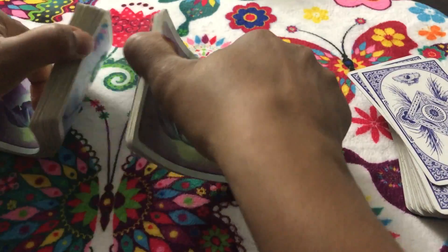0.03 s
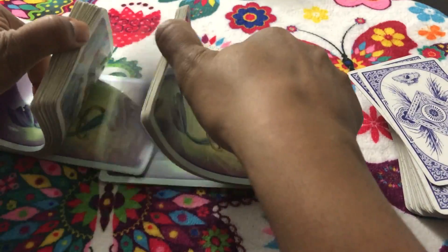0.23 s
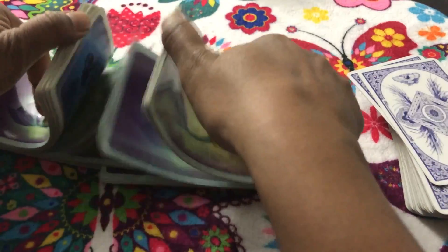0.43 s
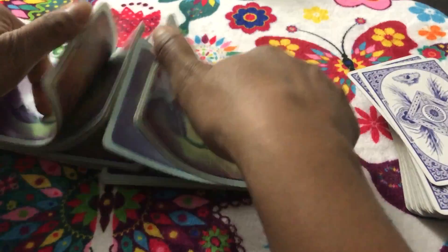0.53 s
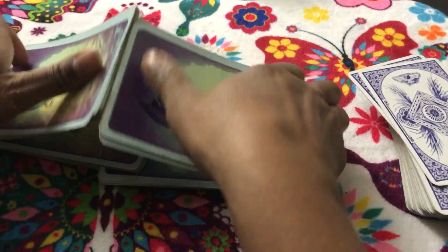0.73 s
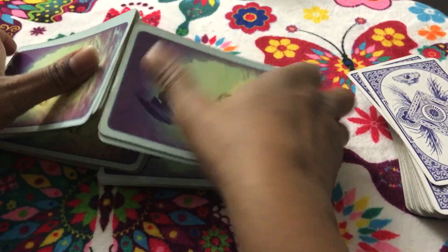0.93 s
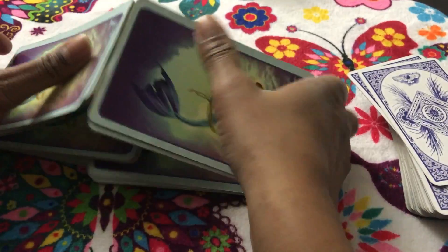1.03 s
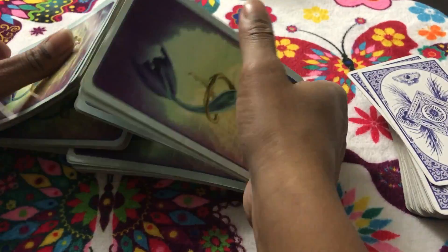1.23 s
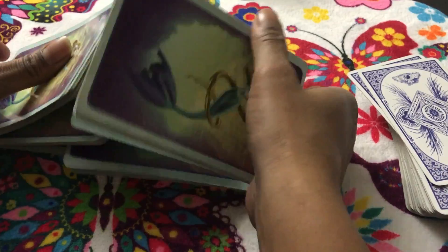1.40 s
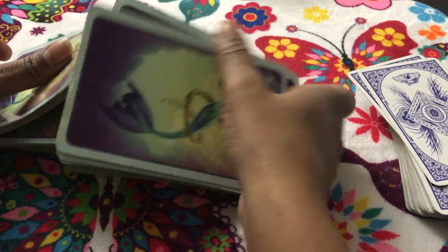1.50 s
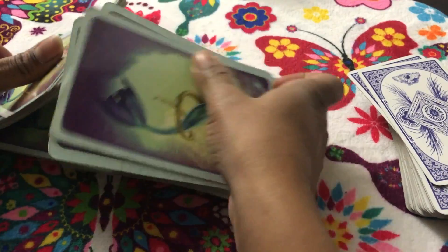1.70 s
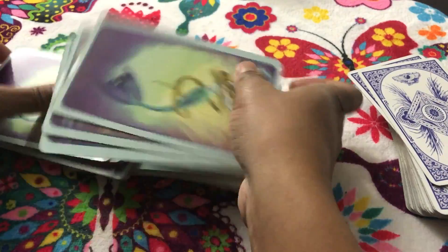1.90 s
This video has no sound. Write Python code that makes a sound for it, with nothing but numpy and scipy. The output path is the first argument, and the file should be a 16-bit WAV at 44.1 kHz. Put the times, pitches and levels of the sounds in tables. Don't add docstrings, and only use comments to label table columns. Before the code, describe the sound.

A deck of large stiff cards is riffled close to a phone microphone on a cloth-covered table, a rapid burst of flicks and slaps, then quiet sliding and light ticks in a softly humming room.

```python
import sys
import numpy as np
from scipy import signal
from scipy.io import wavfile
from scipy.ndimage import uniform_filter1d

SR = 44100
rng = np.random.default_rng(int(sys.argv[2]) if len(sys.argv) > 2 else 0)


def materialize(psi):
    bounded = np.clip(np.atleast_2d(psi).T, -1, 1)
    quanta = np.round(bounded * 32767).astype(np.int16)
    wavfile.write(sys.argv[1], SR, quanta)


def attenuation_scalar(level_db):
    decades = np.asarray(level_db, float) / 20
    return 10 ** decades


N = 85995

# frequency in Hz, width in Hz, level in dB.
HUM_MODES = [
    (46.3, 30, -63.5),
    (99, 4.1, -69),
    (133, 10, -65),
    (234, 3.6, -66),
]
# frequency in Hz, density in dB per Hz.
AIR_SPECTRUM = [(15, -26.5), (25, -2), (182, -16.5), (245, -17.5), (766, -24.5), (1030, -11.5),
                (1730, -16.5), (15200, -34.5), (16500, -52.5)]
# time in seconds, rustle in dB, air puff in dB.
THUMB_PUSH = [(0, -65.5, -81), (.13, -61, -80), (.17, -59, -42.5), (.215, -43, -31.5), (.25, -45, -47.5),
              (.285, -38.5, -30.5), (.32, -53.5, -44.5), (.37, -45, -42), (.43, -24, -38),
              (.455, -39.5, -40), (.5, -45.5, -46.5), (.55, -42, -31.5), (.59, -22, -40.5),
              (.612, -38, -50.5), (.655, -19, -33), (.69, -37, -38), (.74, -46, -61), (.85, -72.5, -72)]
# frequency in Hz, density in dB per Hz.
RUSTLE_SPECTRUM = [(88, -31), (150, -5.5), (1470, -3.5), (1860, -5.5), (2920, -7), (4870, -14),
                   (13000, -21), (15600, -31), (16500, -38.5)]
# frequency in Hz, density in dB per Hz.
PUFF_SPECTRUM = [(25, -20.5), (60, -1.5), (150, -2.5), (400, -20.5), (1500, -55)]
# time in seconds, level in dB.
SLIDE_LEVELS = [(0, -64), (.14, -85), (.2, -84), (.76, -58.5), (.8, -58.5), (.95, -62), (1.035, -52),
                (1.07, -58), (1.15, -57), (1.2, -57), (1.27, -65.5), (1.42, -71), (1.445, -53.5),
                (1.5, -62.5), (1.62, -67.5), (1.76, -64), (1.83, -65.5), (1.87, -65.5), (1.95, -60.5)]
# frequency in Hz, density in dB per Hz.
RUB_SPECTRUM = [(240, -64.5), (400, -9), (1390, 1.5), (1620, -3.5), (3370, -4), (13100, -13.5),
                (15700, -12.5), (16500, -37)]
# time in seconds, peak in dB, card pitch in
# Hz, edge snap in dB.
CARD_FLICKS = [(0.147, -30, 790, -39), (0.166, -35, 702, -5.5), (0.1722, -26.5, 2625, -12),
               (0.1736, -28.5, 699.7, -16), (0.184, -25, 3486, -2), (0.189, -14.5, 1100, -10),
               (0.1915, -17.5, 796, -22), (0.195, -24.5, 996, -20), (0.232, -29.5, 1011, -15),
               (0.235, -27, 756, -13.5), (0.237, -23, 600, -21), (0.258, -42.5, 847, 4.5),
               (0.265, -26.5, 3677, 1), (0.272, -23, 2872, -17), (0.2806, -15.5, 598, -11.5),
               (0.283, -23, 3810, -18.5), (0.2842, -20, 380, -26), (0.288, -21.5, 898, -7),
               (0.292, -24.5, 1300, -20.5), (0.296, -43, 1031, -6), (0.334, -28.5, 833, -13),
               (0.349, -34.5, 713.5, -10.5), (0.36, -20.5, 1064, -25), (0.37, -19.5, 1433, -21.5),
               (0.374, -20.5, 787, -14.5), (0.388, -22.5, 883, -8), (0.397, -21.5, 1483, -16),
               (0.404, -23.5, 3220, -21.5), (0.4099, -23.5, 1600, -21), (0.4306, -21, 1602, -24),
               (0.444, -27, 4600, -7.5), (0.449, -20.5, 724, -7.5), (0.4521, -17, 902, -7.5),
               (.493, -32, 6600, 2.5), (0.505, -38, 5000, 0.5), (.507, -28, 4460, -5),
               (0.5226, -7.5, 1840, -28), (.528, -27, 1500, -13.5), (0.5324, -14.5, 1700, -13.5),
               (0.5491, -8.5, 1960, -18), (0.5498, -18, 3380, -18.5), (0.5535, -24, 1910, -23.5),
               (.562, -30.5, 1900, -22), (.5695, -26, 2028, -11), (.5717, -15.5, 3630, -15.5),
               (.576, -24, 1715, -24), (.5795, -16, 2030, -16), (0.5815, -13, 3010, -25),
               (0.5832, -31, 1520, -17), (0.5881, -16, 700, -19.5), (0.5903, -18.5, 2827, -21),
               (0.5953, -19, 2000, -20), (.599, -15, 2500, -20), (.61, -27.5, 2246, -11),
               (.6335, -21, 1500, -16), (.638, -22.5, 990, -16), (0.6444, -13.5, 1520, -18),
               (0.6459, -18.5, 1080, -7), (0.6496, -17.5, 2330, -10.5), (.654, -13.5, 1620, -0.5),
               (0.6573, -24, 1200, -23), (0.662, -14.5, 2240, -17), (0.664, -15.5, 1400, -16),
               (.672, -24, 1580, 5), (0.6758, -25, 1320, -14), (.683, -25, 800, -7), (.689, -28, 1530, -3),
               (.702, -18, 3650, -29), (.715, -36, 2470, -2)]
# time in seconds, peak in dB, card pitch in Hz, edge snap in dB, upper mode in Hz.
PUSH_TICKS = [(0.869, -44, 790, -5, 3180), (1.045, -34.5, 1190, -8, 3060), (1.072, -48, 982, 4, 3800),
              (1.085, -52, 1300, -15, 2740), (1.097, -31, 1415, -25, 2550), (1.141, -44, 1024, -7, 3980),
              (1.168, -31.5, 1303, -25, 2430), (1.185, -31, 1655, -15, 3875),
              (1.437, -39.5, 1058, -21, 3280), (1.475, -28, 3330, -6, 2080), (1.693, -28, 1395, -20, 2395),
              (1.7455, -36.5, 2900, -9, 3950), (1.877, -26.5, 1430, -14.5, 4090),
              (1.883, -23.5, 1440, -12, 3980), (1.9368, -18, 1520, -10, 4250)]
# time
# in seconds, peak in dB, pitch in Hz, ring t60 in seconds, edge snap in dB.
CLUMP_SLAPS = [(.2038, -10.5, 850, 0.019, -13.5), (0.2056, -11.5, 680, 0.015, -30),
               (.2042, -12, 1500, 0.019, -17.5), (.2052, -12, 4000, 0.0067, -16),
               (.2056, -15.5, 2980, 0.012, -20), (.2062, -15, 5440, 0.0056, -16),
               (.2155, -26.5, 1360, 0.035, -20), (.4135, -11.5, 5840, 0.0022, -22),
               (.4138, -16, 3440, 0.0081, -25), (.4155, -9, 1110, 0.0052, -31),
               (.4172, -4, 2580, 0.014, -33.5), (0.4199, -4, 3320, 0.012, -33),
               (.4178, -5.5, 3270, 0.012, -26), (0.4234, -19.5, 2450, 0.26, -36.5),
               (.429, -25.5, 3340, .2, -30.5), (.5342, -4, 1670, 0.015, -23),
               (.5372, -9.5, 3440, 0.012, -22), (0.5418, -9.5, 2094, 0.016, -30),
               (.546, -17.5, 1970, 0.051, -30), (.5408, -5, 1100, .006, -41),
               (.6198, -17.5, 1890, 0.0094, 3), (.6225, -15, 1650, 0.013, 0.5),
               (.6238, -11, 946, 0.014, -16), (.6258, -14, 2370, 0.004, 0.5), (.6272, -7, 2360, 0.0064, -2),
               (.6274, -6.5, 3480, 0.0092, -16.5), (1.1865, -40, 958, 0.017, -21),
               (1.4752, -32.5, 890, 0.027, -28), (1.4755, -30.5, 1250, 0.02, -30),
               (1.4753, -34.5, 2040, 0.034, -22), (1.6977, -36, 450, 0.014, -17),
               (1.9365, -30, 5360, .006, -26), (1.9365, -29, 3140, .003, -32),
               (1.9372, -32, 1460, .014, -37), (1.947, -43, 1800, 0.012, -6)]
# time in seconds, peak in dB, start in Hz, end in Hz, length in seconds.
POCKET_SQUEAKS = [
    (.4142, -5.5, 930, 3420, 0.0048),
    (.5345, -3.5, 1500, 3630, .005),
    (.6232, -7, 873, 3450, .005),
]
# frequency in Hz, t60 in seconds.
ROOM_T60 = [(100, 0.15), (1000, 0.35), (4000, 0.14), (14000, 0.11)]

RISE_S, FALL_S, KNOCK_S = 0.00071, 0.0025, 0.00004
CARD_T60_S, FLICK_SNAP_T60_S, TICK_SNAP_T60_S = 0.007, 0.01, 0.007
THUD_HZ, THUD_T60_S, THUD_DB, THUD_DB_PER_OCTAVE = 307, 0.011, -6, -4
UPPER_DB, BROAD_DB, SNAP_TRIM_DB = -1.5, -0.5, 6
FLICK_GRIT, SLAP_GRIT = 0.12, 0.41


def evened(x):
    return x / np.sqrt(np.mean(x ** 2) + 1e-20)


def peaked(x):
    return x / (abs(x).max() + 1e-12)


def read(points, hz):
    f, value = np.transpose(points)
    return np.interp(np.log(hz + 1), np.log(f + 1), value)


def level(rows, column):
    rows = np.array(rows)
    return attenuation_scalar(np.interp(np.arange(N) / SR, rows[:, 0], rows[:, column], -200, -200))


def coloured(x, points):
    db = read(points, np.fft.rfftfreq(4096, 1 / SR))
    log_gain = np.log(attenuation_scalar(np.r_[db, db[-2:0:-1]]))
    phase = -signal.hilbert(log_gain).imag
    taps = np.fft.ifft(np.exp(log_gain + 1j * phase)).real[:2048]
    return evened(signal.oaconvolve(x, taps)[:N])


def add(mix, s, sound):
    part = mix[round(s * SR):][:len(sound)]
    part += sound[:len(part)]


def ring(x, hz, t60):
    r = 10 ** (-3 / (t60 * SR))
    return signal.lfilter([1, 0, -1], [1, -2 * r * np.cos(2 * np.pi * hz / SR), r * r], x)


def room_tone():
    out = attenuation_scalar(-66.5) * coloured(rng.standard_normal(N), AIR_SPECTRUM)
    for hz, width_hz, db in HUM_MODES:
        settled = ring(rng.standard_normal(2 * N), hz, 2.7 / width_hz)[N:]
        out = out + attenuation_scalar(db) * evened(settled)
    return out


def riffle():
    grains_per_s, grain_spread_db = 480, 4.5
    size = attenuation_scalar(grain_spread_db * np.minimum(rng.exponential(1, N), 3))
    size = size * (rng.random(N) < grains_per_s / SR)
    spread = np.sqrt(signal.lfilter([1], [1, -.97], size ** 2) + 0.37)
    grains = coloured(spread * rng.standard_normal(N), RUSTLE_SPECTRUM)
    puffs = coloured(rng.standard_normal(N), PUFF_SPECTRUM)
    return grains * attenuation_scalar(-3) * level(THUMB_PUSH, column=1) + puffs * attenuation_scalar(-1.5) * level(THUMB_PUSH, column=2)


def slide():
    skim_s, skim_length_s, skim_db = 1.837, 0.07, 1.5
    grain = attenuation_scalar(2.6 * evened(uniform_filter1d(rng.standard_normal(N), size=130)))
    rub = coloured(rng.standard_normal(N) * grain, RUB_SPECTRUM)
    stroke = np.exp(-((np.arange(N) / SR - skim_s) / skim_length_s) ** 2)
    skim = attenuation_scalar(skim_db) * stroke * np.diff(rub, prepend=0)
    return (rub + skim) * attenuation_scalar(-2) * level(SLIDE_LEVELS, column=1)


def struck(noise, t, envelope):
    return noise[::-1] * envelope + np.exp(-((t - RISE_S) / KNOCK_S) ** 2) / 3


def snap(noise, t, t60):
    burst = noise * attenuation_scalar(-60 * t / t60) * np.minimum(t / RISE_S, 1)
    return peaked(np.diff(burst, n=2, prepend=[0, 0]))


def flick(noise, s, peak_db, card_hz, snap_db, upper_hz=0):
    t = np.arange(len(noise)) / SR
    scrape = struck(FLICK_GRIT * noise, t, np.minimum(t / RISE_S, 1) ** 2 * np.exp(-t / FALL_S))
    card_t60 = CARD_T60_S * min(1, (1500 / card_hz) ** .5)
    card = peaked(ring(scrape, card_hz, card_t60))
    card = card + attenuation_scalar(BROAD_DB) * peaked(ring(scrape, 1800, 0.00026))
    thud_db = THUD_DB + THUD_DB_PER_OCTAVE * np.log2(card_hz / 800)
    snap_t60 = FLICK_SNAP_T60_S
    if upper_hz:
        card = card + attenuation_scalar(UPPER_DB) * peaked(ring(scrape, upper_hz, 0.0031))
        thud_db = thud_db - 18.5
        snap_t60 = TICK_SNAP_T60_S
    thud = attenuation_scalar(thud_db) * peaked(ring(noise * np.exp(-t / 0.0037), THUD_HZ, THUD_T60_S))
    crack = attenuation_scalar(snap_db + SNAP_TRIM_DB) * snap(noise, t, snap_t60)
    return s - RISE_S, attenuation_scalar(peak_db) * (peaked(card) + thud + crack)


def slap(noise, s, peak_db, pitch_hz, t60, snap_db):
    t = np.arange(len(noise)) / SR
    decay = 0.397 * np.exp(-(t / 0.0011) ** 2) + 12.0 * t60 * attenuation_scalar(-60 * t / t60)
    blow = struck(SLAP_GRIT * noise, t, np.minimum(t / RISE_S, 1) * decay)
    thud = attenuation_scalar(snap_db / 2 + THUD_DB) * peaked(ring(blow, THUD_HZ, THUD_T60_S))
    damped = ring(blow, pitch_hz, .0014)
    pocket = peaked(ring(damped, pitch_hz, min(0.55 * t60, .012)))
    crack = attenuation_scalar(snap_db) * snap(noise, t, FLICK_SNAP_T60_S)
    return s - RISE_S, attenuation_scalar(peak_db) * (pocket + thud + crack)


def squeak(noise, s, peak_db, start_hz, end_hz, length_s):
    u = np.arange(len(noise)) / SR / length_s
    hz = start_hz * (end_hz / start_hz) ** np.minimum(u, 1.2)
    swell = u * np.exp(-(u / 0.81) ** 4)
    rough = 1 + 0.87 * evened(uniform_filter1d(noise, size=20))
    return s, attenuation_scalar(peak_db) * peaked(swell * rough * np.sin(2 * np.pi * np.cumsum(hz) / SR))


def room(x):
    taps = np.zeros(SR // 2)
    at = np.arange(200, len(taps) - 20, 20)
    taps[at + rng.integers(0, 20, len(at))] = rng.choice([-1., 1.], len(at))
    hz, t, z = signal.stft(taps, SR, nperseg=256)
    decay = attenuation_scalar(-60 * t / read(ROOM_T60, hz)[:, None])
    tail = signal.istft(z * decay, SR, nperseg=256)[1]
    return signal.fftconvolve(x, tail / np.linalg.norm(tail))[:N]


def scene():
    bed = room_tone() + riffle() + slide()
    cards = np.zeros(N)
    for row in CARD_FLICKS + PUSH_TICKS:
        add(cards, *flick(rng.standard_normal(size=2000), *row))
    for row in CLUMP_SLAPS:
        add(cards, *slap(rng.standard_normal(size=6000), *row))
    for row in POCKET_SQUEAKS:
        add(cards, *squeak(rng.standard_normal(size=800), *row))
    return (cards + bed + attenuation_scalar(-19) * room(cards))[None]


def top_cut(x):
    return signal.sosfilt(signal.butter(12, 16960, fs=SR, output="sos"), x)


def record(dry):
    low_pass = signal.firwin(511, 15750, window=("kaiser", 9), fs=SR)
    mix = signal.oaconvolve(dry, low_pass[None], "same")
    return top_cut(mix)


dry = scene()
out = record(dry)
materialize(out)
```